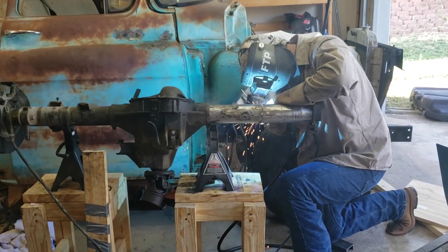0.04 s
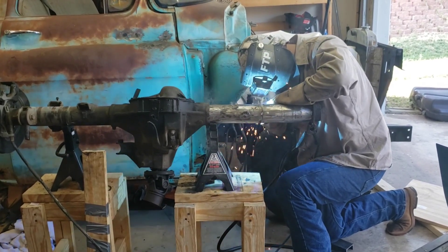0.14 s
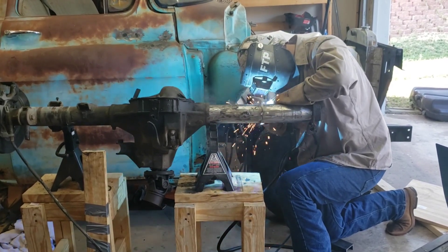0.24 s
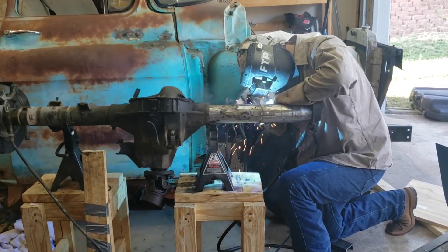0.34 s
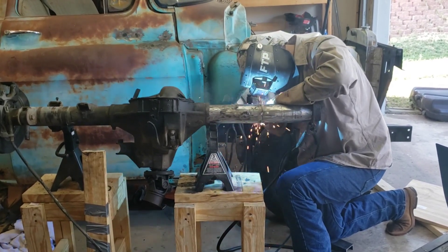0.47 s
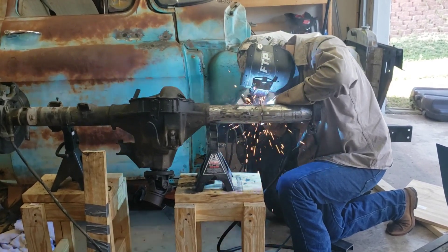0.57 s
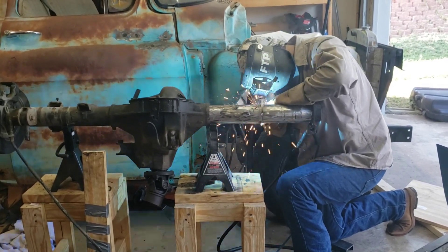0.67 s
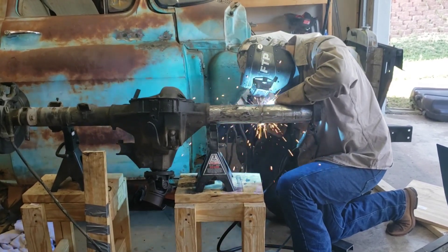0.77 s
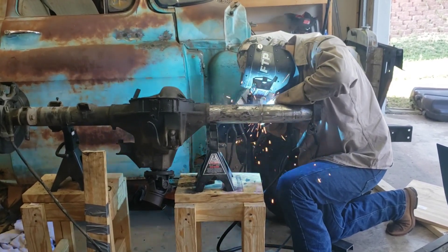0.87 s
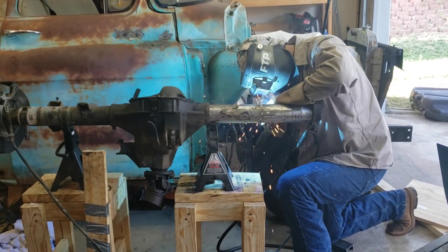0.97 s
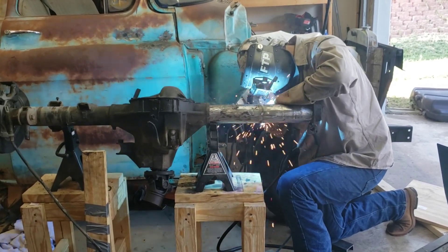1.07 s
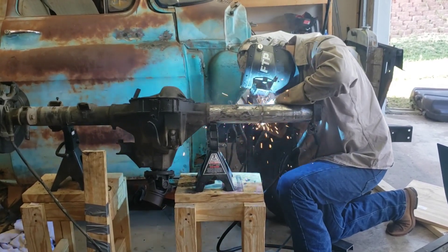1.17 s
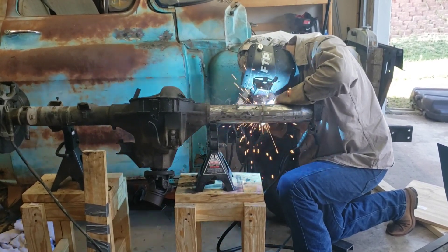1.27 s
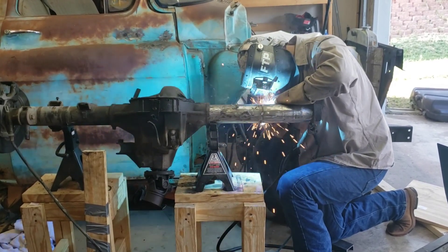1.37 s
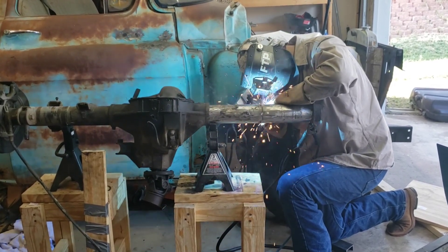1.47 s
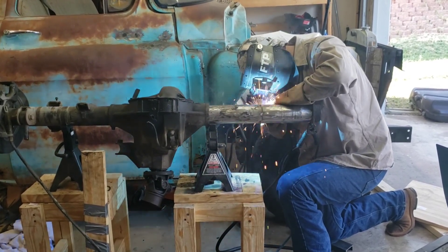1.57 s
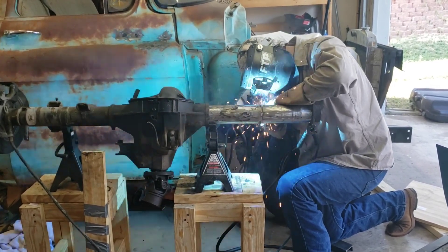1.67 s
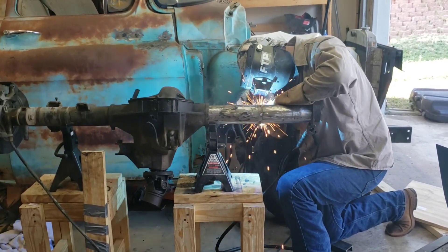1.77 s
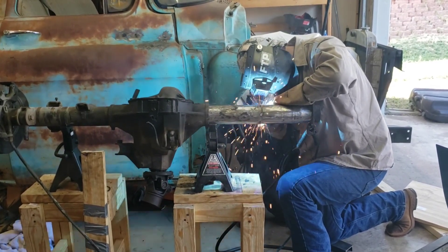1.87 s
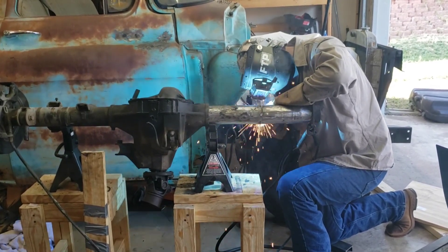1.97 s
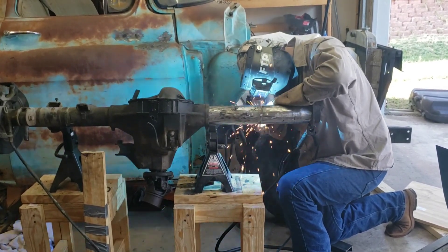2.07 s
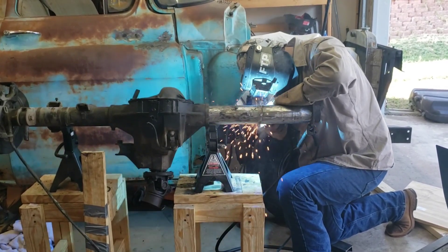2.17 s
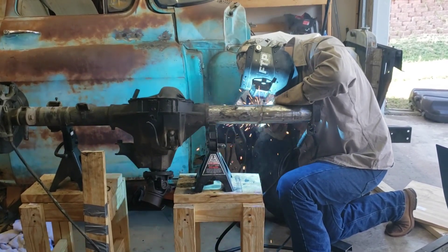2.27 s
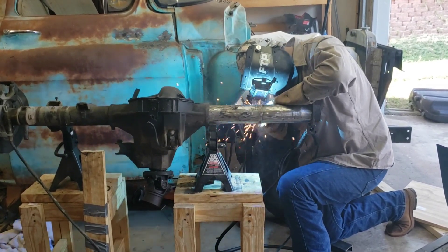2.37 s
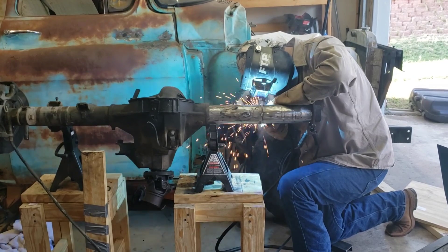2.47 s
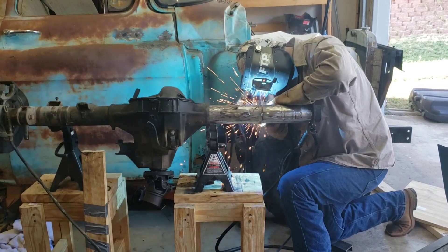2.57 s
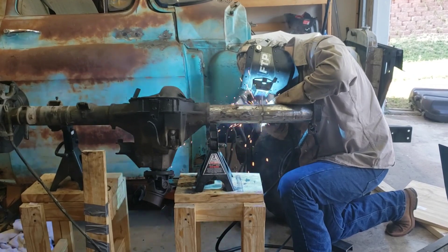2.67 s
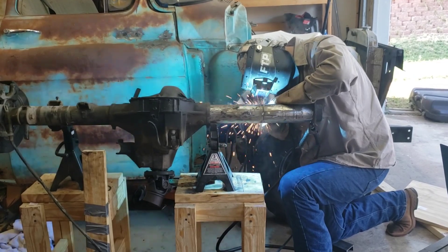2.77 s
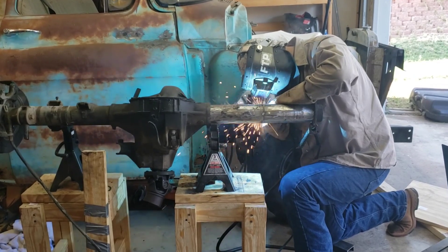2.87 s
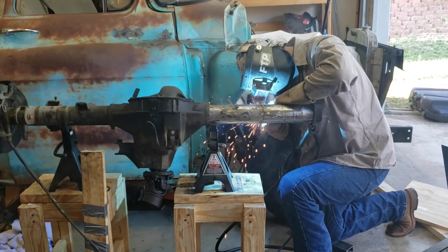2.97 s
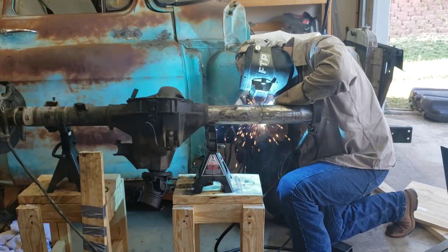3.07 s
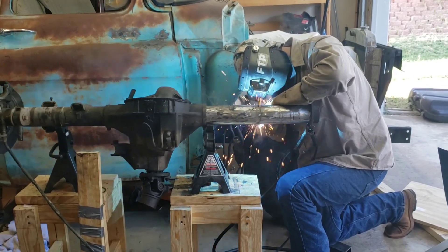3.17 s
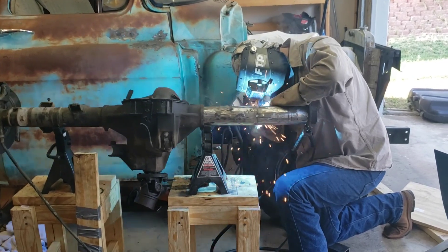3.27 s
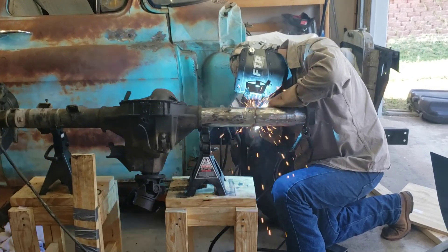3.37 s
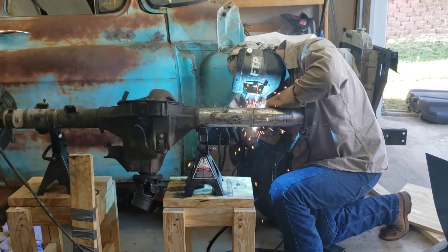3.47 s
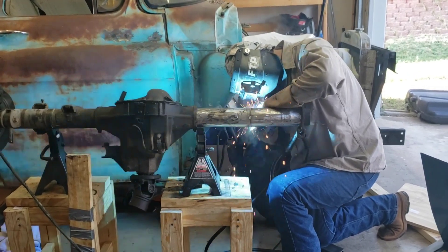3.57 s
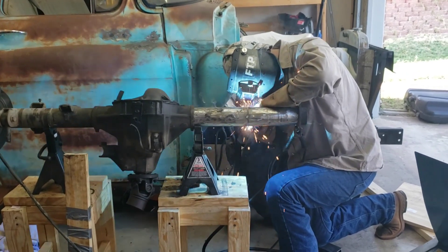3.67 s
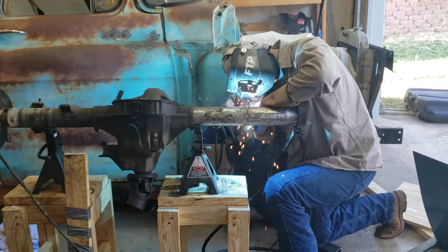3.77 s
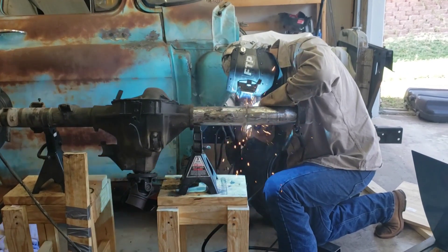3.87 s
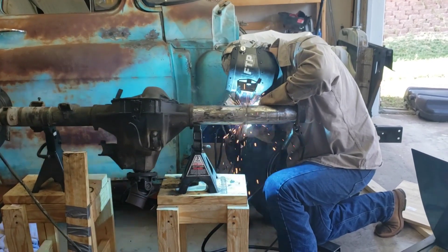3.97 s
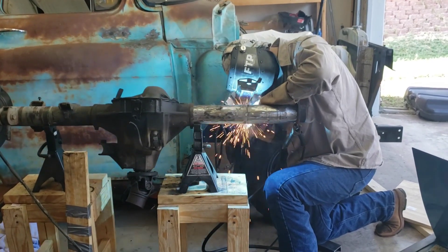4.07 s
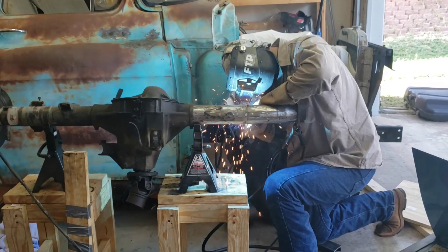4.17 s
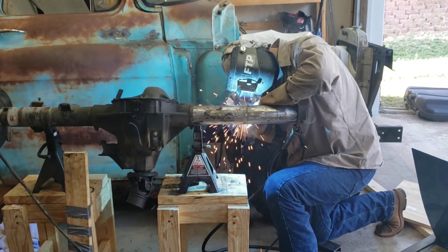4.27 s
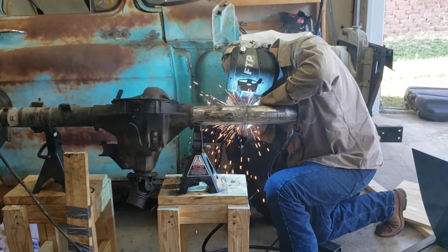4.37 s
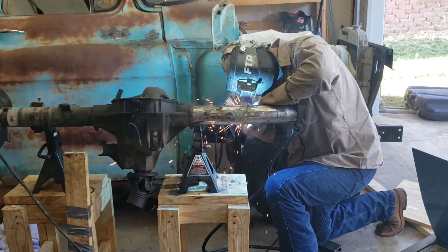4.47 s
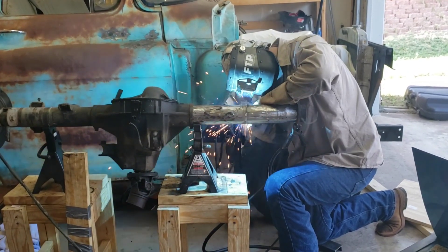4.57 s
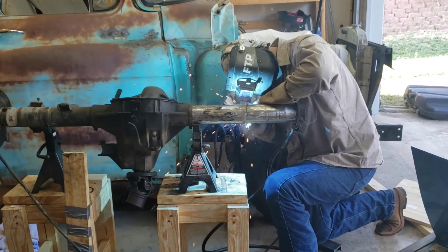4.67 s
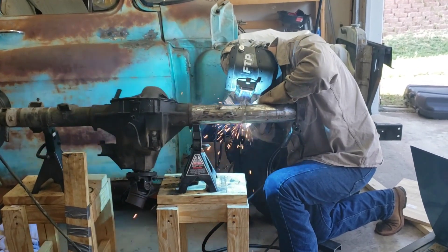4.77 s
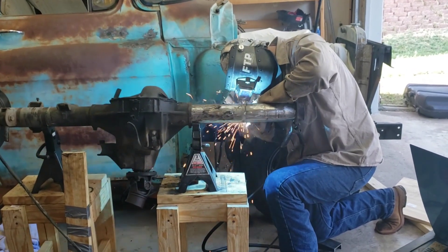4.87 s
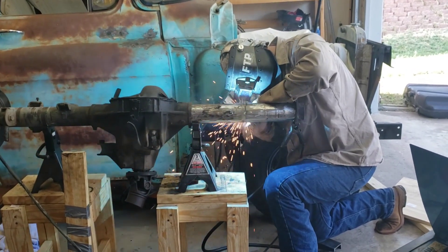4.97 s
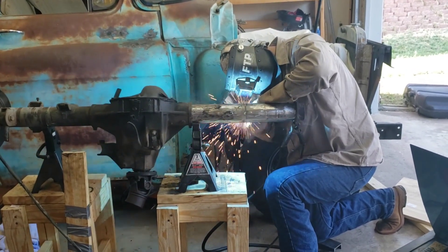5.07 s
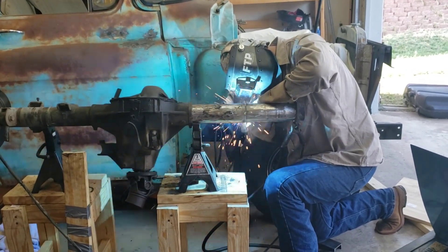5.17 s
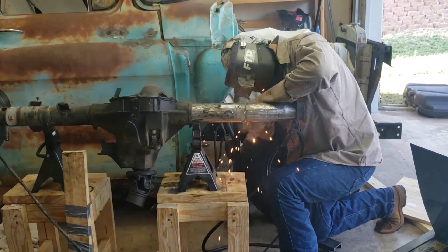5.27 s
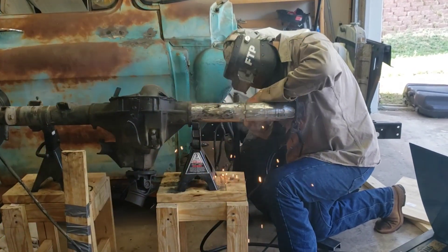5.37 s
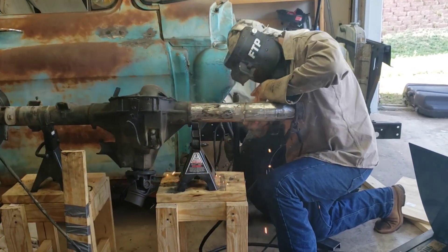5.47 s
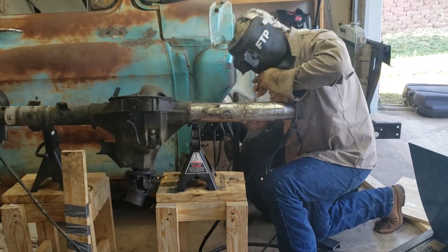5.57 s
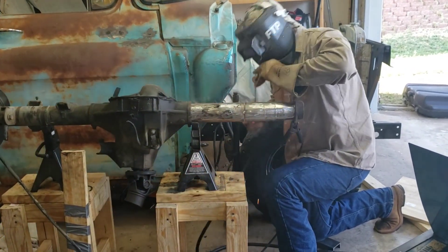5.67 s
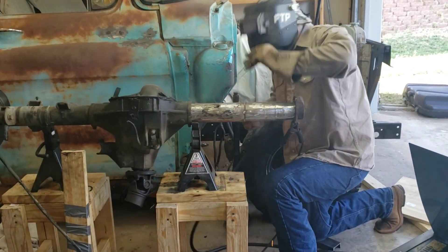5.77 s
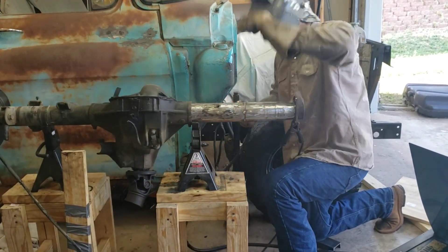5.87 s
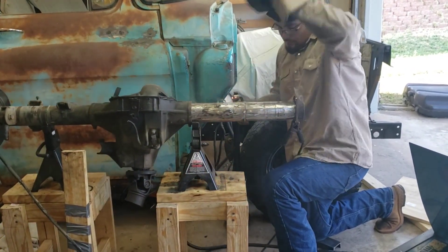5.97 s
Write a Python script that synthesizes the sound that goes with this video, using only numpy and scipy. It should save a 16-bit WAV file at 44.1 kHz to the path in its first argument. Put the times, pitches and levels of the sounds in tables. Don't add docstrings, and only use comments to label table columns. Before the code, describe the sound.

A harsh, crackling wire-weld buzz spits and pops in an open garage, then cuts off abruptly, leaving a low fan hum and a far bird chirp.

```python
import sys
import numpy as np
from scipy import signal
from scipy.fft import rfft, irfft, next_fast_len
from scipy.io import wavfile
from scipy.ndimage import uniform_filter1d

SR = 44100
rng = np.random.default_rng(int(sys.argv[2]) if len(sys.argv) > 2 else 0)


def natural_amplitude(level_db):
    exponent = np.asarray(level_db, float) / 20
    return 10 ** exponent


def log_audio(samples):
    frames = np.atleast_2d(samples).T
    limited = np.clip(frames, -1, 1)
    pcm = np.round(limited * 32767).astype(np.int16)
    wavfile.write(sys.argv[1], SR, pcm)


N = 265769
FAST = next_fast_len(N)
LAST_POP_S = 5.239


def along(table, hz):
    table_hz, value = np.transpose(table)
    return np.interp(np.log(hz + 1), np.log(table_hz), value)


def colour(x, table):
    gain = natural_amplitude(along(table, np.fft.rfftfreq(4096, 1 / SR)))
    cepstrum = irfft(np.log(gain))
    cepstrum[1:2048] *= 2
    cepstrum[2049:] = 0
    response = irfft(np.exp(rfft(cepstrum)))
    response = response.reshape((1,) * (x.ndim - 1) + (-1,))
    return signal.fftconvolve(x, response, axes=-1)[..., :N]


def band(x, lo_hz, hi_hz):
    sos = signal.butter(2, [lo_hz, min(hi_hz, .49 * SR)], "band", fs=SR, output="sos")
    return signal.sosfilt(sos, x)


def split(x, centres_hz):
    size = x.shape[-1]
    spectrum = rfft(x)
    log_hz = np.log(np.fft.rfftfreq(size, 1 / SR) + 1)
    weights = [np.interp(log_hz, np.log(centres_hz), row) for row in np.eye(len(centres_hz))]
    return [irfft(spectrum * weight, size) for weight in weights]


def walk(rate_hz):
    hold = int(SR / rate_hz)
    levels = rng.standard_normal(N // 400 + 1)[:N // hold + 1]
    steps = np.repeat(levels, hold)
    return uniform_filter1d(uniform_filter1d(steps, hold), hold)[:N]


# hz, share (0-1)
ALIKE = [(60, 0.83), (300, 0.91), (640, 0.63), (1400, 0.34), (16000, 0)]


def diffuse(size):
    both, own = rfft(rng.standard_normal((2, size)))
    share = np.clip(along(ALIKE, np.fft.rfftfreq(size, 1 / SR)), 0, 1)
    other = share * both + np.sqrt(1 - share ** 2) * own
    return irfft(np.array([both, other]), size)


# hz, level_db_per_hz
SHOP = [(20, -101), (55, -86.5), (95, -86.5), (160, -87.5), (225, -77.5), (320, -81), (570, -84.5),
        (1200, -85), (1600, -92), (2800, -100), (3400, -108), (4000, -104), (5400, -108), (6500, -118),
        (8000, -120), (12000, -120.5), (14500, -119.5), (16000, -113)]
# hz, width_hz, level_db
FAN_RINGS = [(50.5, 5, -64), (128, 13.3, -68), (214.3, 6.1, -61), (257.2, 18, -60.5), (329.4, 19, -93),
             (572, 44, -56.5), (703.3, 29, -59.5), (1058, 9.8, -62)]
SHOP_DB, SWELL_DB, FLICKER_DB = 2.5, -2.5, 2.5


def shop():
    octaves = split(diffuse(FAST), 60 * 2. ** np.arange(9))
    swell_db = SWELL_DB * walk(2.697)
    air = sum(part[:, :N] * natural_amplitude(swell_db + FLICKER_DB * walk(8.0)) for part in octaves)
    out = colour(air, SHOP) * natural_amplitude(SHOP_DB) * np.sqrt(SR / 2)
    noise = diffuse(FAST)[:, :N]
    for hz, width_hz, level_db in FAN_RINGS:
        ring = band(noise, hz - width_hz / 2, hz + width_hz / 2)
        out += natural_amplitude(level_db) * ring / np.std(ring)
    return out


# start_s, length_s, pitch_hz, level_db
CHIRPS = [
    (5.79, .045, 4400, -71),
    (5.922, .03, 4350, -70),
    (5.955, .025, 4200, -72),
]
CHIRP_FALL_HZ_PER_S, CHIRP_ROUGH_DB = 6000, 5


def bird():
    t, out = np.arange(N) / SR, np.zeros(N)
    for start_s, length_s, pitch_hz, level_db in CHIRPS:
        late_s = (t - start_s).clip(0, length_s)
        swell = np.sin(np.pi * late_s / length_s)
        cycles = (pitch_hz - CHIRP_FALL_HZ_PER_S * late_s / 2) * late_s
        out += natural_amplitude(level_db) * swell * np.sin(2 * np.pi * cycles)
    return out * natural_amplitude(CHIRP_ROUGH_DB * walk(100))


RUSTLE_HZ, RUSTLE_DB = 9000, -62.5
RUSTLE_FROM_S, RUSTLE_RISE_S, RUSTLE_FALL_S = 5.75, 0.12, 0.53


def rustle():
    late_s = (np.arange(N) / SR - RUSTLE_FROM_S).clip(0)
    shape = (1 - np.exp(-late_s / RUSTLE_RISE_S)) * np.exp(-late_s / RUSTLE_FALL_S)
    shape *= natural_amplitude(2.0 * walk(35.0))
    return natural_amplitude(RUSTLE_DB) * shape * band(rng.standard_normal((2, N)), RUSTLE_HZ, 20000)


# delay_ms, left_db, right_db
ECHOES = [(0, .5, -7), (.42, 1, -3), (.8, -3, -10), (1.4, -14, -12), (2.7, 3.5, -4), (3.3, -1.5, -6),
          (4.5, -10, -13), (5.6, -8, -8), (7.4, -5, -12), (10.2, -9, -12), (11.7, -9, -12)]
# hz, gain_db
EARLY = [(300, -10.5), (1500, -5.5), (5000, 1), (8000, -0.5), (12000, 6)]
# hz, t60_s
T60 = [(700, 0.27), (2500, 0.22), (4800, 0.31), (7000, 0.3), (10000, 0.24), (15000, 0.25)]
SMEAR_MS, WANDER_MS = 0.11, .05
SHADED_MS = 1.1
TAIL_DB, TAIL_RISE_MS = -22, 3.63


def garage(shade_db):
    size, early_size = 16384, 1024
    t = np.arange(size) / SR
    centres_hz, t60_s = np.transpose(T60)
    parts = split(diffuse(size), centres_hz)
    tail = sum(part * natural_amplitude(-60 * t / s) for part, s in zip(parts, t60_s))
    tail *= natural_amplitude(TAIL_DB) * (1 - np.exp(-t * 1000 / TAIL_RISE_MS))
    early = np.zeros((2, size))
    for delay_ms, *port_db in ECHOES:
        late_ms = t[:early_size] * 1000 - delay_ms - WANDER_MS * rng.random((2, 1))
        smear = np.exp(-late_ms.clip(0) / SMEAR_MS) * (late_ms >= 0)
        rough = rng.standard_normal((2, early_size)) * smear
        flat = irfft(np.exp(1j * np.angle(rfft(rough))))
        gain_db = np.add(port_db, shade_db * (delay_ms < SHADED_MS))
        early[:, :early_size] += natural_amplitude(gain_db)[:, None] * flat
    return colour(early, EARLY)[:, :size] + tail


# start_s, peak_db, sag_db
BURSTS = [(0.4549, -6.5, -1), (0.562, -6.5, -1), (0.6079, -5.5, 2.5), (0.657, -14, 4), (1.6208, -11, 4),
          (1.8054, -5.5, 3.5), (2.3224, -9.5, 1.5), (2.503, -9.5, 0.5), (2.595, -5, 0), (2.7456, -7, 3.5),
          (2.9123, -5.5, 1), (2.9591, -13.5, 2), (3.0892, -7.5, 3), (3.1805, -5.5, 1.5), (3.455, -4, 0),
          (3.763, -3.5, -0.5), (3.84, -1.5, -2.5), (3.9589, -4, -4), (4.0133, -4.5, 2), (4.0405, -2, -1.5),
          (4.1542, -2.5, -2), (4.4023, -6, 6), (4.4898, -2, -5), (4.525, -8.5, 3), (4.5808, -1.5, -0.5),
          (4.6103, -7.5, 4.5), (4.7442, -5, 1), (4.8643, -9.5, 1), (4.978, -8, 0), (5.1807, -5, 3.5),
          (5.2295, -6, 3)]
SAG_S, FLARE_S, FLARE_SHARE = 0.12, 0.039, 0.45
FLUTTER_DB, FLUTTER_PER_S = -0.8, 19


def strength(t):
    out_db = FLUTTER_DB * np.pad(walk(FLUTTER_PER_S), (0, len(t) - N))
    for start_s, _, sag_db in BURSTS:
        near = slice(*np.searchsorted(t, [start_s - 5 * SAG_S, start_s + 5 * FLARE_S]))
        late_s = t[near] - start_s
        sag = -np.exp(late_s.clip(None, 0) / SAG_S)
        flare = FLARE_SHARE * np.exp(-late_s.clip(0) / FLARE_S)
        out_db[near] += sag_db * np.where(late_s < 0, sag, flare)
    return out_db


# start_s, level_db, open_db
ARC = [(0, -24, 4), (0.028, -33, -3), (.09, -32, -2.5), (.2, -34, -2), (.62, -31.5, 0.5), (.78, -33, 0.5),
       (1.1, -33, -1), (1.6, -30, -0.5), (1.95, -31.5, -1), (2.4, -32.5, 0), (2.9, -29, -0.5),
       (3.4, -33.5, -0.5), (3.7, -35, -1.2), (4.3, -28, -1.6), (4.45, -30.5, 0.5), (4.54, -28, -2),
       (4.63, -31.5, -3), (4.76, -31.5, -0.9), (5.235, -29.5, -2.5)]
# start_s, peak_db
SPITS = [(0.0704, -7.5), (0.3215, -8), (0.4744, -10), (0.6795, -9.5), (1.2645, -10), (1.497, -20),
         (1.6598, -8), (1.6703, -16), (1.7568, -7), (1.824, -8), (2.1043, -14), (2.1302, -9),
         (2.4471, -6.5), (2.6126, -8.5), (2.621, -11.5), (2.8122, -10.5), (2.9458, -5), (2.99, -15),
         (3.0961, -8.5), (3.1112, -7), (3.1878, -5), (3.2304, -6.5), (3.2429, -9), (3.2612, -8),
         (3.498, -7.5), (3.619, -11.5), (3.8487, -6), (3.866, -7), (4.0254, -18), (4.0555, -6),
         (4.064, -10), (4.1972, -7.5), (4.2141, -5.5), (4.248, -10), (4.2946, -12), (4.3049, -6.5),
         (4.4132, -7), (4.425, -5), (4.436, -6.5), (4.4459, -2.5), (4.4575, -7), (4.4709, -4.5),
         (4.4786, -5.5), (4.5, -14), (4.622, -3), (4.6404, -6), (4.7709, -6), (4.8021, -6), (4.8422, -3),
         (4.8728, -2.5), (4.8948, -8.5), (4.9299, -9.5), (4.9965, -8.5), (5.0057, -10), (5.0444, -9),
         (5.0641, -3), (5.1352, -6), (5.152, -10), (5.2036, -5), (5.2385, -10.5)]
# hz, gain_db
POP = [(100, -26), (250, -5.5), (500, -12.5), (900, -2), (1500, -7), (2300, -1), (3000, -1), (4500, -5),
       (6200, -3.5), (8000, -7.5), (10000, -0.5), (14000, 1.5), (15600, 3)]
POP_GAP_S, GAP_SPREAD, STUCK_S = .0089, .15, .008
POP_DB, POP_SCATTER_DB, BURST_DB, SIZZLE_DB = 21.5, 2.5, 1.5, -7
SPIT_SHARE, SPIT_DB = .05, 1.5
LOW_UNCOVERS = 0.15
LOW_RESISTS, MID_RESISTS = 0.31, 0.5


def arc():
    t = np.arange(FAST) / SR
    arc_s, level_db, open_db = np.transpose(ARC)
    swing_db = np.interp(t, arc_s, level_db) + strength(t)
    open_db = np.interp(t, arc_s, open_db)

    gap_chance, size_chance = rng.standard_normal((900, 2)).T
    louder = rng.random(900) < SPIT_SHARE
    gaps_s = POP_GAP_S * np.exp(GAP_SPREAD * gap_chance[1:])
    pop_s = LAST_POP_S - np.r_[0, np.cumsum(gaps_s)]
    pop_db = np.interp(pop_s, t, swing_db) + POP_DB + POP_SCATTER_DB * size_chance + SPIT_DB * louder

    burst_s, burst_db, _ = np.transpose(BURSTS)
    spit_s, spit_db = np.transpose(SPITS)
    lead_s = burst_s[:, None] - pop_s
    stuck = np.any((lead_s < STUCK_S) & (lead_s > -POP_GAP_S / 2), axis=0)
    clear = np.abs(spit_s[:, None] - pop_s).min(axis=0) > .7 * POP_GAP_S
    free = (pop_s > 0) & ~stuck & clear

    when_s = np.r_[pop_s[free], burst_s, spit_s]
    size_db = np.r_[pop_db[free], burst_db + BURST_DB, spit_db + BURST_DB]
    x = np.zeros(FAST)
    np.add.at(x, (when_s * SR).astype(int), natural_amplitude(size_db))
    x += natural_amplitude(swing_db + SIZZLE_DB) * (t < LAST_POP_S) * rng.standard_normal(FAST)

    low, mid, high = split(x, [2000, 4800, 9000])
    quick_db = swing_db - uniform_filter1d(swing_db, SR // 2)
    low *= natural_amplitude(LOW_UNCOVERS * open_db - LOW_RESISTS * quick_db)
    mid *= natural_amplitude(open_db - MID_RESISTS * quick_db)
    return colour(high + low + mid, POP)


# hz, width_hz, gain_db
BODY = [(254, 50, 2), (325, 120, 4.5), (885, 84, 5.5), (1495, 136, 7.5), (1650, 204, 3), (1860, 110, -2),
        (2194, 260, 2), (2838, 280, -6), (3062, 290, -4.5), (3555, 380, -2.5), (3760, 115, 0.5),
        (4490, 130, 4), (4950, 240, 2.5), (6230, 330, 1), (15700, 280, 3.5)]


def body(x):
    for hz, width_hz, gain_db in BODY:
        b, a = signal.iirpeak(hz, hz / width_hz, SR)
        x = x + (natural_amplitude(gain_db) - 1) * signal.lfilter(b, a, x)
    return x


PLACES = 13
STAYS = .2
SHADE_DB = -6
LEFT_GAIN_DB_PER_S = 0.28


def scene():
    pops, t = body(arc()), np.arange(N) / SR
    weld = np.zeros((2, N + SR))
    common = garage(SHADE_DB / 2)
    place_s = np.linspace(0, LAST_POP_S, PLACES)
    for row, shade_db in zip(np.eye(PLACES), np.linspace(SHADE_DB, 0, PLACES)):
        here = np.sqrt(np.interp(t, place_s, row))
        first, last = np.flatnonzero(here)[[0, -1]]
        response = np.sqrt(STAYS) * common + np.sqrt(1 - STAYS) * garage(shade_db)
        heard = signal.fftconvolve((pops * here)[None, first:last], response, axes=1)
        weld[:, first:first + heard.shape[1]] += heard
    weld = weld[:, :N]
    weld[0] *= natural_amplitude(LEFT_GAIN_DB_PER_S * (t - 6.5))
    return weld + shop() + rustle() + bird()


def band_limit(x):
    return signal.sosfilt(signal.butter(12, 17070, fs=SR, output="sos"), x)


# hz, gain_db
LEFT_PORT = [(40, -12.5), (200, -4.5), (450, -5), (900, -7), (2000, -3.5), (3100, 2.5), (3550, 6.5),
             (3800, 6.5), (4800, 9), (5400, 7), (6200, -1), (7200, -5.5), (7900, -26.5), (8700, -9),
             (9600, 1), (15000, -3)]
CEILING_DB, TOP_HZ = -1.5, 15720


def record(dry):
    ports = np.array([colour(dry[0], LEFT_PORT), dry[1]])
    ports = natural_amplitude(CEILING_DB) * np.tanh(ports / natural_amplitude(CEILING_DB))
    ports = signal.sosfilt(signal.ellip(12, .3, 80, TOP_HZ, fs=SR, output="sos"), ports)
    return band_limit(ports)


dry = scene()
out = record(dry)
log_audio(out)
```